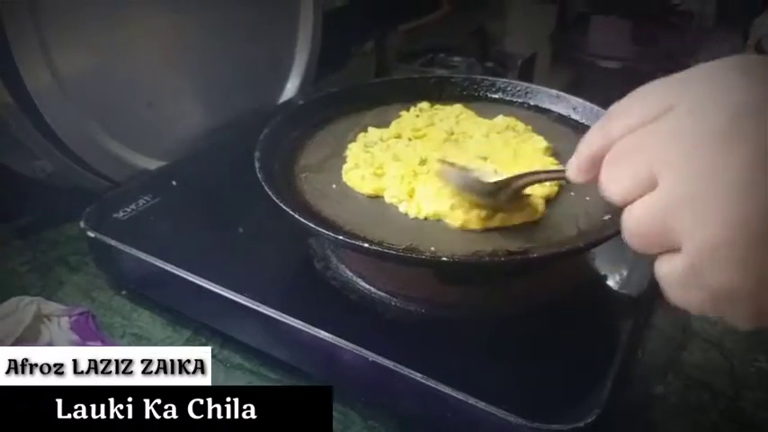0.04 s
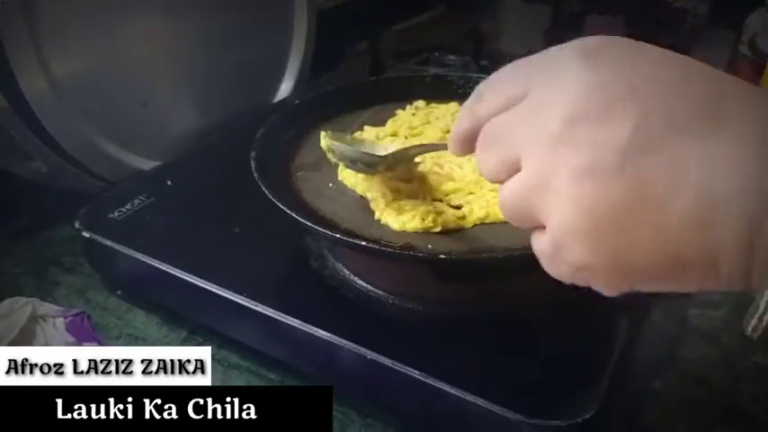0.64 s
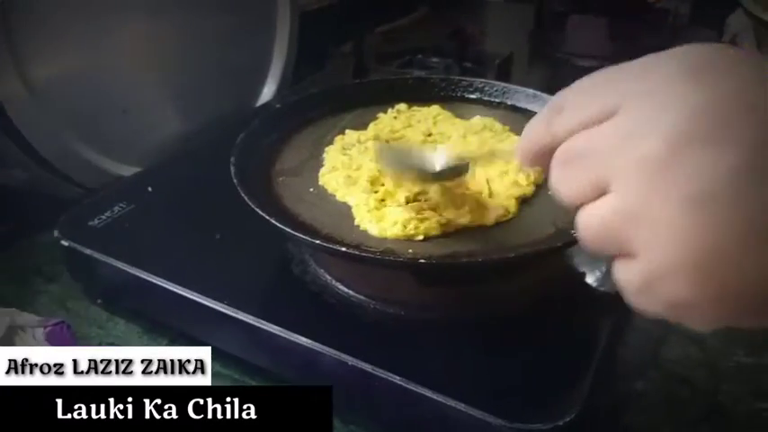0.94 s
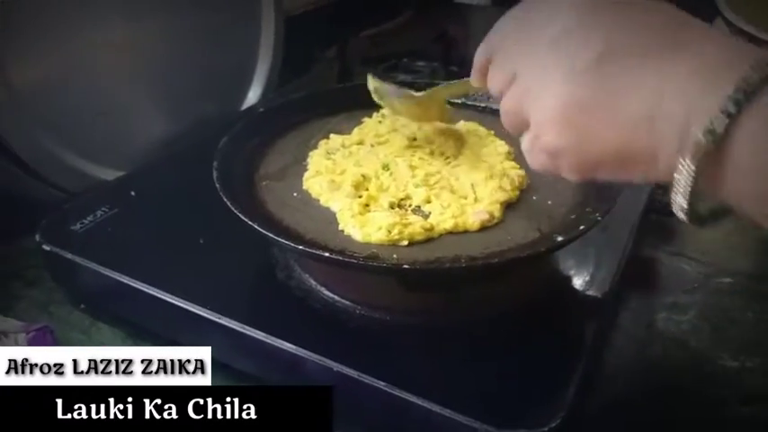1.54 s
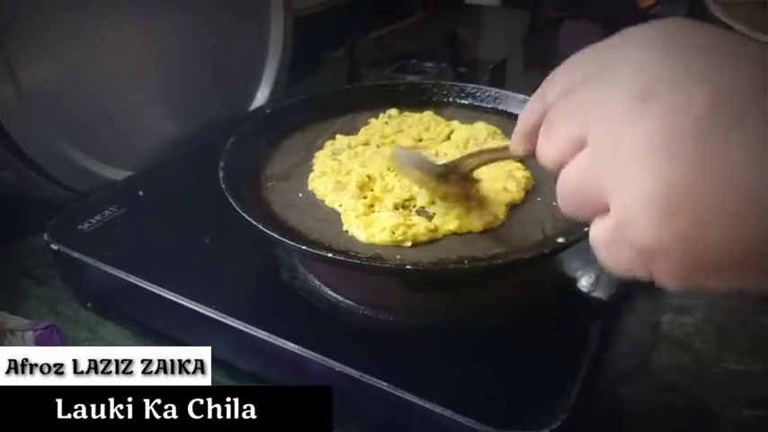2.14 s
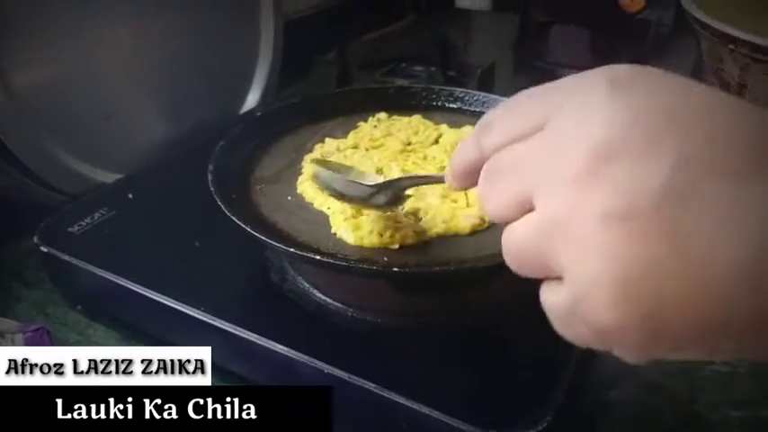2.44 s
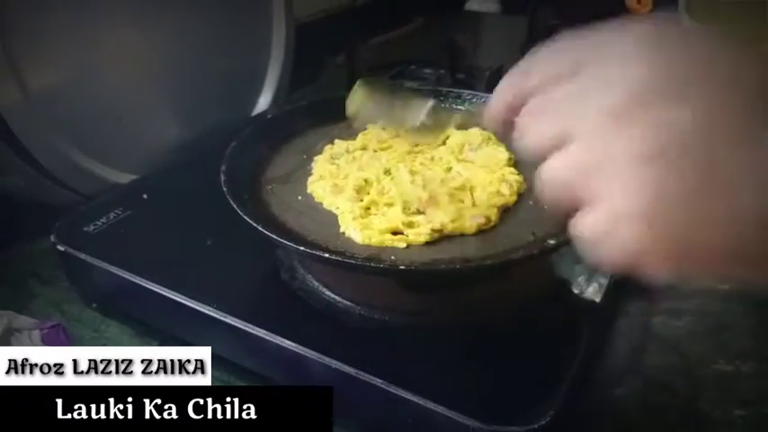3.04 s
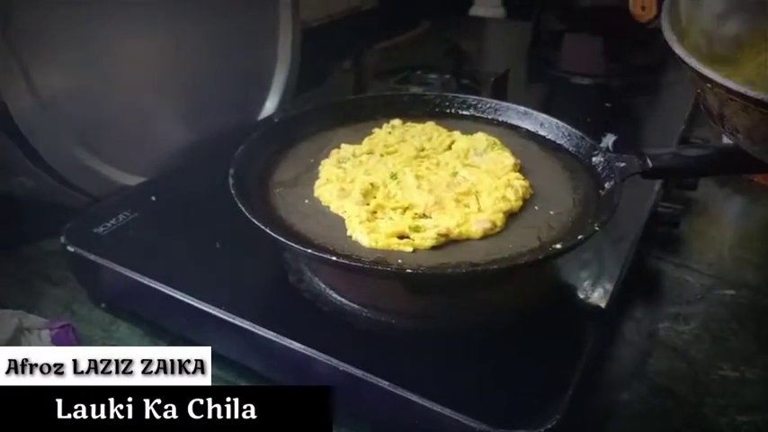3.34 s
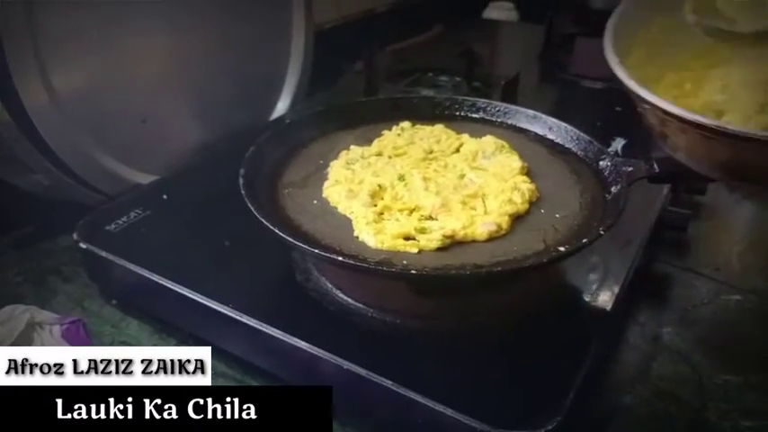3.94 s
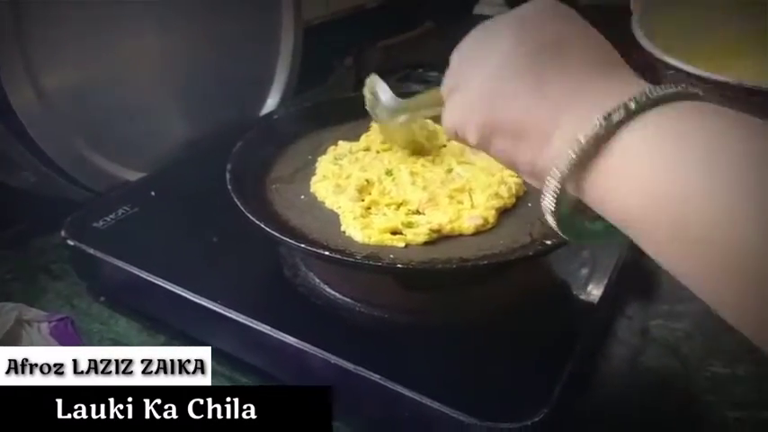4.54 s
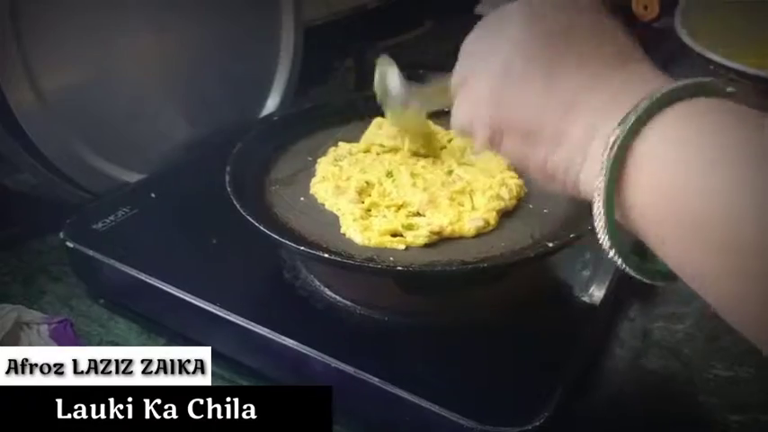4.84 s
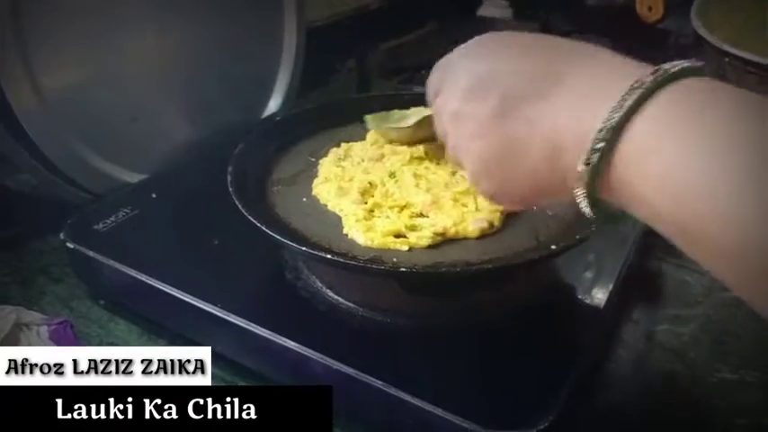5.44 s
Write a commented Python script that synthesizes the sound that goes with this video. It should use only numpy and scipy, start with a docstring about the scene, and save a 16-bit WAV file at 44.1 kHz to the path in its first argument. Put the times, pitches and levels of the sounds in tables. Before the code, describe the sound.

A bright, hissing sizzle of batter frying on a flat pan, with occasional oil snaps, soft nudges and a padded thump.

```python
"""Wet batter sizzles in hot oil on a flat pan in a small kitchen: thousands of steam bubbles burst each
second, some ring briefly, a few spit. The frying flares early on, and handling the spoon and batter
brings low rubs, wet clicks and nudges to the pan. At 3.1 s something is set down with a dull thump.
The sizzle slowly eases until, near 5.5 s, fresh batter revives it."""
import sys
import numpy as np
from scipy import signal
from scipy.fft import rfft, irfft
from scipy.io import wavfile
from scipy.ndimage import uniform_filter1d

SR = 44100
rng = np.random.default_rng(int(sys.argv[2]) if len(sys.argv) > 2 else 0)


def wav_record(signal):
    """Record a signal, one row per channel, as 16-bit PCM in the file named by sys.argv[1]."""
    frames = np.transpose(np.atleast_2d(signal))
    bounded = np.clip(frames, -1, 1)
    # unit amplitude maps onto the largest positive 16-bit level
    quanta = np.round(bounded * 32767).astype(np.int16)
    wavfile.write(sys.argv[1], SR, quanta)


N = 250929

# slow arc of the hot oil's hiss, the wet batter's fizz and the low sputter:
# time_s, hiss_db, fizz_db, sputter_db
FRY_ARC = [(0, -24.5, -28.5, -36.5), (0.6, -24, -25.5, -37.5), (1.3, -24.5, -26.5, -38.0),
           (2.05, -25, -28.5, -42), (2.45, -27.0, -29, -39.5), (3.1, -27.5, -30.5, -42.0),
           (3.5, -25.5, -33.5, -43), (4.15, -28.5, -34.5, -46.5), (4.75, -30.5, -35.5, -48.5),
           (5.38, -30.5, -33.5, -45), (5.69, -28.5, -34.5, -41.5)]
# flares as batter meets hot oil: centre_s, length_s, hiss_rise_db, fizz_rise_db
FLARES = [(.076, .03, 3, 1), (.44, .16, 1, 2), (1.02, .13, 0, 2.5), (2.71, .12, 1.2, 0),
          (3.04, .08, .5, 1.8), (3.757, .06, 2.2, 0), (4.99, .07, 2.6, 0), (5.56, .17, 3.3, 4.3)]


def frying_levels(waver_per_s=11):
    """Faders in dB for hiss, fizz, sputter and fine spray: a slow arc, brief flares, a slight waver."""
    hiss_db, fizz_db, sputter_db = curves(FRY_ARC)
    hiss_rise_db = sum(db * bell(s, length) for s, length, db, _ in FLARES)
    fizz_rise_db = sum(db * bell(s, length) for s, length, _, db in FLARES)
    waver_db = 0.34 * walk(waver_per_s)
    spray_db = hiss_db - 10.5 + 0.33 * hiss_rise_db + waver_db
    hiss_db += hiss_rise_db + waver_db
    fizz_db += fizz_rise_db + waver_db - 0.1 * walk(waver_per_s)
    sputter_db += 0.42 * fizz_rise_db + waver_db + 1.13 * walk(waver_per_s)
    return hiss_db, fizz_db, sputter_db, spray_db


# tone of one bursting bubble: freq_hz, gain_db
BURST_EQ = [(300, -35), (520, -38.5), (740, -35), (950, -19.5), (1300, -18.5), (2500, -14), (3300, -4.5),
            (4400, -3.5), (5400, 4.5), (6700, -6), (8000, -10.5), (9300, -23.5), (12500, -25.5),
            (15500, -24)]
# resonances of the pan and its surroundings, added on top of that tone: centre_hz, width_hz, added_db
PAN_PEAKS = [(1015, 5, -8), (1092, 24, 5), (1374, 16, -1), (1493, 14.6, 6.5), (1608, 70, 1.5),
             (1660, 13, -31), (1893, 8.5, -1), (2107, 18, -3.5), (2010, 16, -21), (3170, 6.1, -19),
             (3725, 340, 3), (3965, 133, 1), (4880, 35, -16), (4850, 1200, -23.5), (9980, 190, -2.5),
             (10720, 270, 0), (12450, 1300, 0.5)]


def sizzle(hiss_db, fizz_db, sputter_db, spray_db):
    """Crackle and ringing bubbles over a bed of steam; gentler frying has fewer bursts."""
    vigour = amp(hiss_db - hiss_db.mean())
    crackle = unit(bursts(per_s=2600 * vigour, spread_db=3))
    pings = bubbles(per_s=2400 * vigour, low_hz=3366, high_hz=8730, cycles=3.8, sizes=16)
    steam = rng.standard_normal(N)
    fry = colour(kitchen_reverb(steam + amp(-4) * crackle + amp(-7.5) * pings), BURST_EQ, PAN_PEAKS)
    # the finest oil droplets tick on their own, high in the treble
    ticks = bubbles(per_s=5000 * vigour, low_hz=7750, high_hz=15700, cycles=0.85, sizes=10)
    ticks = colour(ticks, BURST_EQ, PAN_PEAKS)
    sputter = amp(sputter_db) * band(fry, 250, 2800)
    fizz = amp(fizz_db) * band(fry, 2800, 4400)
    hiss = amp(hiss_db) * band(fry, 4400, 8500)
    spray = amp(spray_db) * band(fry + .4 * ticks, 8500, 16000)
    return sputter + fizz + hiss + spray


def bubbles(per_s, low_hz, high_hz, cycles, sizes, spread_db=3.5):
    """Burst bubbles ring as open cavities, each size at its own pitch, falling to 1/e in `cycles`."""
    t = np.arange(SR // 50) / SR
    out = np.zeros(N)
    for hz in np.linspace(low_hz, high_hz, sizes):
        ping = unit(np.sin(2 * np.pi * hz * t) * np.exp(-hz * t / cycles))
        out += signal.oaconvolve(bursts(per_s / sizes, spread_db), ping)[:N]
    return unit(out)


# featured oil spits: start_s, peak_db
BIG_SPITS = [(.081, -11), (.545, -9), (1.028, -10), (1.578, -11), (2.3427, -5), (3.538, -12), (3.758, -11),
             (3.773, -10), (3.855, -12), (4.053, -14), (4.597, -18), (4.996, -16)]


def spits(hiss_db, spatter_s=.0007):
    """An oil droplet bursts with a snap and about a millisecond of spatter."""
    out, t = np.zeros(N), np.arange(SR // 40) / SR
    snap = response(BURST_EQ, PAN_PEAKS)
    for start_s, peak_db in list(BIG_SPITS) + small_spits(hiss_db):
        push = .2 * rng.standard_normal(len(t)) * np.exp(-t / spatter_s)
        push[0] += 1
        # a spit bursts in the open, so it snaps brighter than bubbles under the batter
        bright_push = np.diff(push, prepend=0)
        place(out, start_s, peak_db, signal.fftconvolve(bright_push, snap)[:len(t)])
    return out


def small_spits(hiss_db, per_s=4, over_hiss_db=9, spread_db=1.2):
    """Cues (start_s, peak_db) for random small spits, as strong as the oil is lively."""
    starts = np.flatnonzero(rng.random(N) < per_s / SR)
    peak_db = hiss_db + over_hiss_db + spread_db * rng.standard_normal(N)
    return list(zip(starts / SR, peak_db[starts]))


# short low rubs and wet clicks of handling: centre_s, length_s, rub_db, rub_pitch_hz, smear_db
HANDLING_CUES = [(0.035, 0.1, -57, 171, -75), (0.92, 0.08, -53.5, 141, -64), (1.26, 0.28, -54, 145, -76),
                 (1.757, 0.04, -41.5, 152, -43), (1.79, 0.17, -59, 192, -43), (2.33, 0.093, -53, 140, -52),
                 (2.597, 0.2, -54, 104, -60), (3.037, 0.039, -50, 108.7, -72),
                 (3.405, 0.053, -47, 121.6, -53), (3.567, 0.04, -49, 208, -76),
                 (4.642, 0.078, -50, 217, -43), (4.37, 0.095, -55, 130, -71),
                 (5.615, 0.1, -51, 131.3, -47.5)]
# tone of the smeared batter's wet clicks: freq_hz, gain_db
SMEAR_EQ = [(200, -22), (400, 9), (620, 16), (830, 23.5), (1200, 22), (2000, -53)]


def spoon_and_batter(rub_width_hz=90, smear_left_db=-3):
    """Short low rubs, and wet clicks a little to the right, as the spoon and batter are handled."""
    clicks = colour(bursts(per_s=3700, spread_db=5), SMEAR_EQ)
    rub = sum(swell(resonance(hz, rub_width_hz), s, length, db) for s, length, db, hz, _ in HANDLING_CUES)
    smear = sum(swell(clicks, s, length, db) for s, length, _, _, db in HANDLING_CUES)
    # a faint low rub from the handling comes and goes throughout
    light_rub = resonance(hz=92, width_hz=rub_width_hz) * amp(-68.5 + 5.5 * walk(per_s=4.7))
    return rub + light_rub + smear * amp([[smear_left_db], [0]])


# soft nudges from handling the spoon and batter: start_s, peak_db, push_s
PAN_NUDGES = [(.03, -49, 0.045), (2.028, -41, 0.035), (2.67, -51, .04), (2.904, -48, .035),
              (3.104, -37.5, 0.0145), (3.344, -42, 0.086), (3.568, -41, 0.053), (4.006, -45.5, 0.057),
              (4.202, -45, 0.027), (4.653, -41.5, 0.033), (4.852, -45.5, 0.053), (5.119, -46.5, 0.11),
              (5.3, -48.5, 0.037)]
# modes of the pan on the hob: pitch_hz, level_db, t60_s
PAN_RING = [(315, 18, 0.19), (350, -42, 0.038), (218, 0, 0.096)]


def pan_nudges():
    """Soft rubbing pushes ring the pan's low modes."""
    out, pan = np.zeros(N), ring(PAN_RING)
    for start_s, peak_db, push_s in PAN_NUDGES:
        envelope = signal.windows.tukey(int(push_s * SR))
        push = envelope * rng.standard_normal(len(envelope))
        place(out, start_s, peak_db, signal.fftconvolve(push, pan))
    return out


# modes of the worktop: pitch_hz, level_db, t60_s
WORKTOP_RING = [(70, -5.5, 0.077), (118, -0.5, 0.049), (198, -6, .028), (246, -7, 0.037)]


def thump(start_s=3.1055, peak_db=-19, contact_s=0.0061):
    """Something is set down: one padded blow shakes the worktop."""
    out = np.zeros(N)
    shake = np.convolve(ring(WORKTOP_RING), np.hanning(int(contact_s * SR)))
    # the worktop radiates as it accelerates, so the deepest bass is weak
    place(out, start_s, peak_db, -np.diff(shake))
    return out


def rim(sputter_db, level_db=-59.5, follow=0.71, waver_db=6):
    """The sputter keeps the pan's rim singing faintly, in random swells."""
    drive_db = follow * (sputter_db - sputter_db.mean())
    return resonance(hz=1091, width_hz=190) * amp(level_db + drive_db + waver_db * walk(per_s=10))


# tone of the dull crackle: freq_hz, gain_db
DULL_CRACKLE_EQ = [(100, -25), (250, -5), (500, -21), (750, 6.5), (950, 26), (1300, 24.5), (2000, 3),
                   (3500, -41), (8000, -44)]


def dull_crackle(sputter_db):
    """A dull midrange crackle, mostly on the right, following the sputter's level."""
    crackle = colour(bursts(per_s=4600, spread_db=5.5), DULL_CRACKLE_EQ)
    level_db = sputter_db - 7 + 3.4 * walk(per_s=17)
    return np.array([[.1], [1]]) * crackle * amp(level_db)


def kitchen_reverb(x, wet_db=-14, t60_s=.12, predelay_s=.002):
    """Close tiles and cupboards return a short diffuse tail."""
    t = np.arange(SR // 4) / SR
    tail = rng.standard_normal(len(t)) * np.exp(-np.log(1000) * t / t60_s) * (t > predelay_s)
    return x + amp(wet_db) * signal.fftconvolve(x, tail / np.linalg.norm(tail))[:N]


# tone of the kitchen background: freq_hz, gain_db
ROOM_EQ = [(20, -18), (45, 3), (80, 1), (130, -2.5), (220, 0), (320, -1), (480, -10), (1000, -26),
           (4000, -28)]


def room_tone(level_db=-62.5):
    """A quiet, wavering rumble, with a fainter diffuse layer that differs between left and right."""
    centre = colour(rng.standard_normal(N), ROOM_EQ) * amp(level_db + 0.99 * walk(per_s=11))
    diffuse = colour(rng.standard_normal(N), ROOM_EQ) * amp(level_db - 17.5)
    return centre + np.array([[-1], [1]]) * diffuse


def amp(db):
    """Decibels to gain."""
    return 10 ** (np.asarray(db) / 20)


def unit(x):
    """Scale to rms 1."""
    return x / np.sqrt(np.mean(x ** 2))


def place(out, start_s, peak_db, sound):
    """Mix in a one-shot at a given peak level."""
    i = int(start_s * SR)
    out[i:i + len(sound)] += amp(peak_db) * sound[:N - i] / np.abs(sound).max()


def bursts(per_s, spread_db):
    """Random clicks: many small, a few large."""
    size = amp(spread_db * np.minimum(rng.exponential(size=N), 4.6))
    return (rng.random(N) < per_s / SR) * size * rng.choice([-1, 1], N)


def ring(modes):
    """Free decay of a set of modes."""
    t = np.arange(SR // 2) / SR
    return sum(amp(db) * np.sin(2 * np.pi * hz * t) * np.exp(-np.log(1000) * t / t60_s)
               for hz, db, t60_s in modes)


def resonance(hz, width_hz):
    """A randomly driven resonance: a tone of wandering strength and phase; rms 1."""
    phase = 2 * np.pi * hz * np.arange(N) / SR
    return unit(walk(width_hz) * np.cos(phase) + walk(width_hz) * np.sin(phase))


def response(eq, peaks=(), size=4096):
    """Impulse response of an EQ curve with resonant peaks on top."""
    freq_hz = np.arange(size // 2 + 1) * SR / size + 1
    hz, db = np.transpose(eq)
    gain = amp(np.interp(np.log(freq_hz), np.log(hz), db))
    for centre_hz, width_hz, added_db in peaks:
        gain *= 1 + amp(added_db) / (1 + (2 * (freq_hz - centre_hz) / width_hz) ** 2)
    # minimum phase keeps attacks sharp, with no ringing ahead of them
    cepstrum = irfft(np.log(gain))
    cepstrum[1:size // 2] *= 2
    cepstrum[size // 2 + 1:] = 0
    return irfft(np.exp(rfft(cepstrum)))


def colour(x, eq, peaks=()):
    """Pass a sound through an EQ curve and its peaks; rms 1."""
    return unit(signal.fftconvolve(x, response(eq, peaks))[:len(x)])


def band(x, low_hz, high_hz):
    """One band of a sound, without delay; rms 1."""
    sos = signal.butter(6, [low_hz, high_hz], "band", fs=SR, output="sos")
    return unit(signal.sosfiltfilt(sos, x, padtype="even", padlen=SR // 10))


def curves(table):
    """Breakpoint rows to fader curves, one for each column after the time."""
    time_s, *columns = np.transpose(table)
    return [np.interp(np.arange(N) / SR, time_s, column) for column in columns]


def walk(per_s):
    """Random drift that glides to a new value per_s times a second; rms 1."""
    hold = int(SR / per_s)
    steps = np.repeat(rng.standard_normal(N // hold + 1), hold)
    return unit(uniform_filter1d(steps, hold)[:N])


def bell(centre_s, length_s):
    """A smooth rise and fall, 1 at its centre."""
    return np.exp(-(2 * (np.arange(N) / SR - centre_s) / length_s) ** 2)


def swell(x, centre_s, length_s, level_db):
    """Fade a steady sound in and out, reaching level_db at the centre."""
    shape = bell(centre_s, length_s)
    local_rms = np.sqrt(np.average(x ** 2, weights=shape ** 2 + 1e-12))
    return amp(level_db) * shape * x / local_rms


def scene():
    """The pan straight ahead, a dull crackle mostly on the right, a quiet room."""
    hiss_db, fizz_db, sputter_db, spray_db = frying_levels()
    frying = sizzle(hiss_db, fizz_db, sputter_db, spray_db) + spits(hiss_db) + rim(sputter_db)
    handling = pan_nudges() + thump() + spoon_and_batter()
    return frying + handling + dull_crackle(sputter_db) + room_tone()


def record(dry, low_cut_hz=50, high_cut_hz=15500):
    """Master EQ: thin the deepest bass and cut the top steeply."""
    thinned = signal.sosfilt(signal.butter(2, low_cut_hz, "high", fs=SR, output="sos"), dry)
    return signal.sosfilt(signal.ellip(12, .1, 80, high_cut_hz, fs=SR, output="sos"), thinned)


dry = scene()
out = record(dry)
wav_record(out)
```